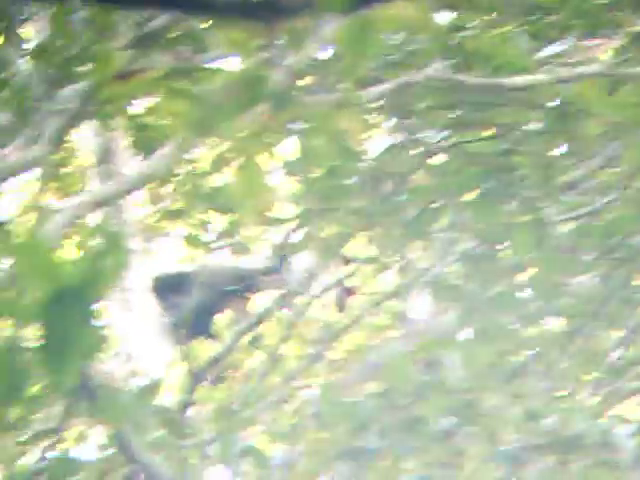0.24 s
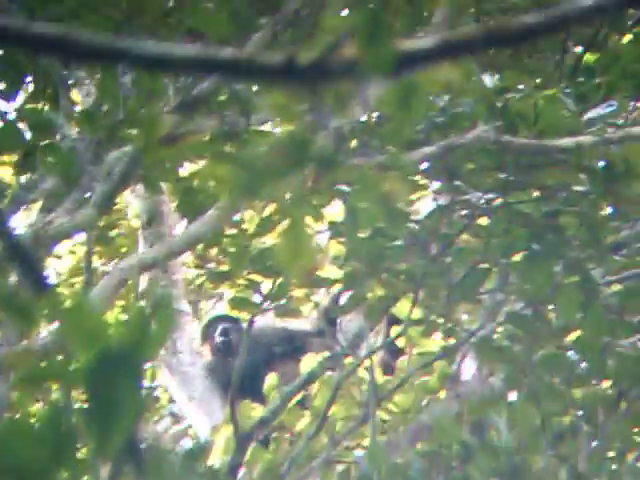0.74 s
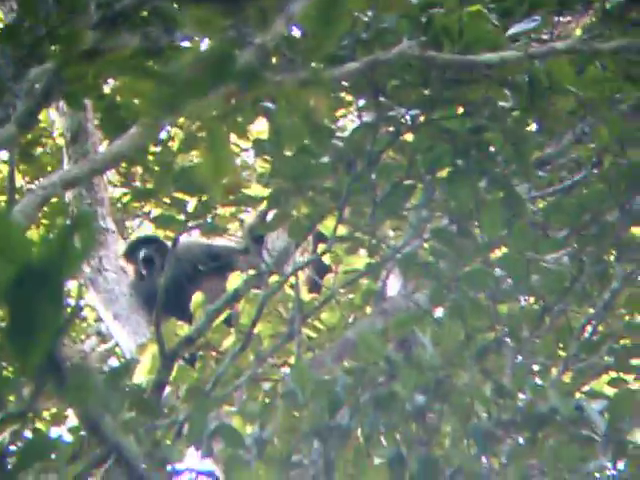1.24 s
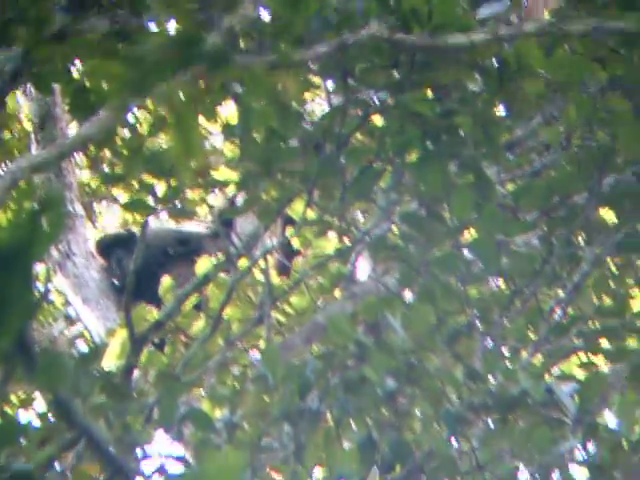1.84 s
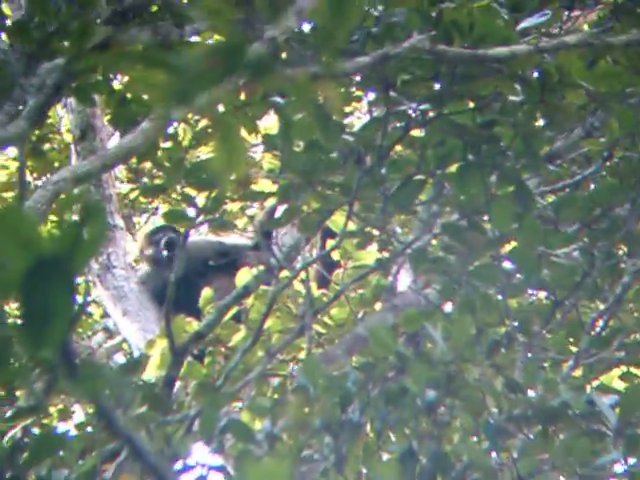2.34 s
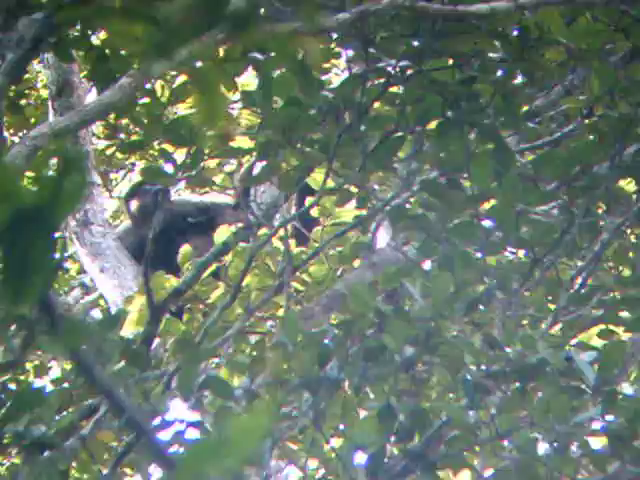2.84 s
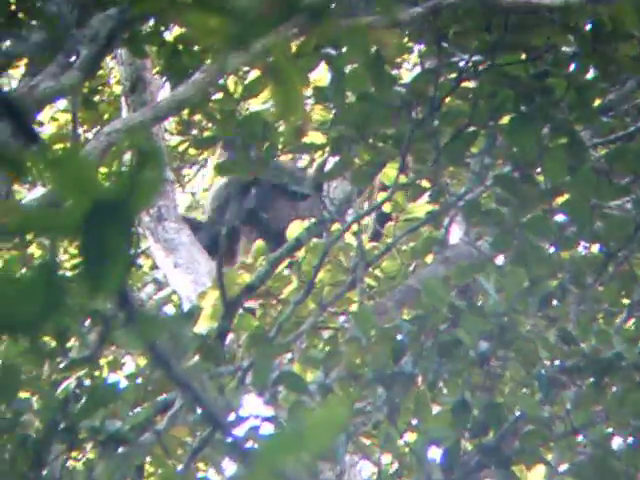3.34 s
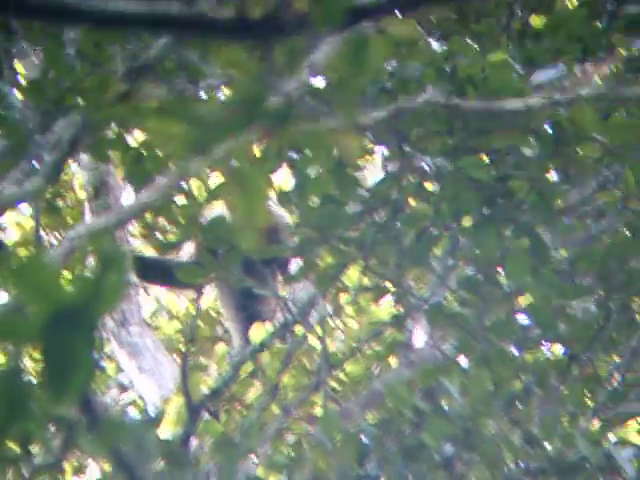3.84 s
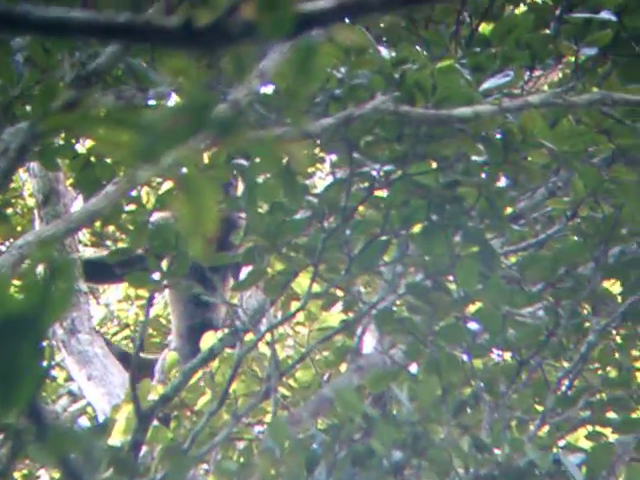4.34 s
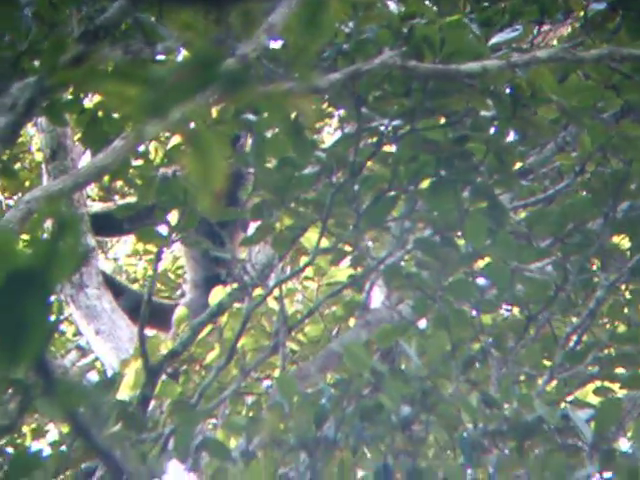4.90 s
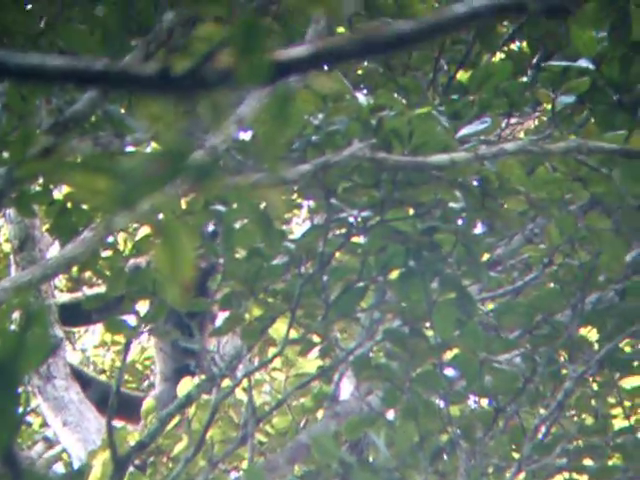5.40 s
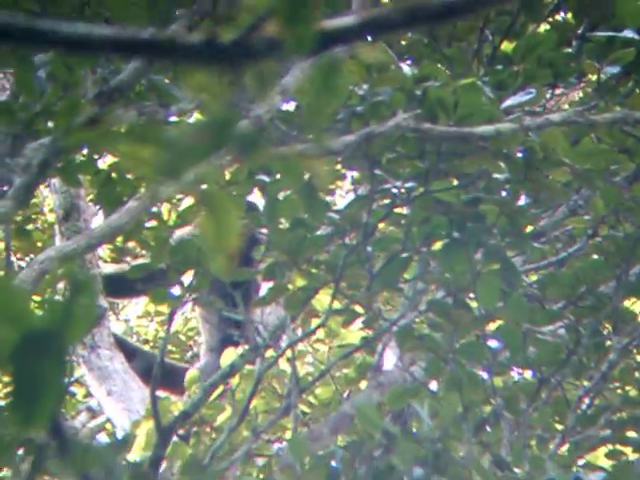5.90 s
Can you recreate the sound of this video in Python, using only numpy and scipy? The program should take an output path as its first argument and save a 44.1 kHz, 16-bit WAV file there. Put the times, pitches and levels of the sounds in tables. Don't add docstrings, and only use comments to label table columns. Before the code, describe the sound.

From the first moment a monkey in the canopy utters short, high yelps, about three per second until the end near 6 seconds. Each is almost a pure whistle that rises quickly, swells, arches and drops. Around 1 to 1.3 seconds some crack upward and roughen; from 1.6 to 2.8 they are strongest and mostly cleaner; from 3.1 onward squeaky, raspy breaks are frequent, with a lower wavering note underneath. Trunks and leaves return a long, blurred echo. A distant monkey answers faintly and hoarsely at about 1.4, 2.2 to 2.6, 3.0 and 4.2 seconds, mostly falling calls. Close handling knocks on the camera begin at once, with a low thump near 0.2, a loud sharp click at 0.85, another at 1.65, and bumps near 3.25 and 6.1. Faint insect buzz, regular thin cricket chirps and soft airy hiss continue throughout.

```python
import sys
import numpy as np
from scipy import signal
from scipy.fft import rfft, irfft
from scipy.io import wavfile
from scipy.ndimage import uniform_filter1d

SR = 44100
rng = np.random.default_rng(int(sys.argv[2]) if len(sys.argv) > 2 else 0)


def generate_wav(signal):
    frames = np.transpose(np.atleast_2d(signal))
    scaled = np.clip(frames, -1, 1) * 32767
    pcm = np.round(scaled).astype(np.int16)
    wavfile.write(sys.argv[1], SR, pcm)


def gain_from_decibels(decibels):
    exponent = np.asarray(decibels, float) / 20
    return 10 ** exponent


N = 271656

# start in seconds, length until the pitch has dropped in seconds,
# level in dB, held pitch in Hz, opening pitch in Hz.
YELPS = [(.04, 0.13, -25, 1790, 1666), (.495, 0.16, -21, 1807, 1572), (.925, 0.12, -22, 1900, 1546),
         (1.235, .14, -23, 1800, 1611), (1.575, 0.16, -20, 1848, 1675), (2.0, 0.13, -20, 1859, 1657),
         (2.395, 0.15, -19, 1900, 1743), (2.78, 0.11, -20, 1855, 1565), (3.1, 0.14, -24, 1899, 1571),
         (3.435, 0.13, -22.5, 1943, 1619), (3.775, .165, -23.5, 1844, 1393), (4.31, .12, -23.5, 1799, 1553),
         (4.66, 0.15, -25.5, 1960, 1737), (4.985, .14, -24.5, 1892, 1797), (5.285, 0.14, -24, 1900, 1824),
         (5.6, 0.15, -23, 1875, 1763), (5.975, 0.12, -23, 1840, 1560)]
# time of the top in seconds, top pitch in Hz,
# climb in seconds, fall in seconds, roughness from 0 to 1.
BREAKS = [(0.553, 1855, 0.011, 0.049, 0), (.985, 2120, .035, .02, 0.45), (1.288, 2700, 0.018, 0.025, 0.6),
          (1.638, 1900, .03, 0.041, .4), (2.062, 1950, 0.018, .025, 0.2), (2.451, 1900, 0.049, 0.036, 0.2),
          (2.839, 1863, 0.015, .03, 0), (3.167, 2350, .025, .03, .55), (3.489, 2795, .035, 0.049, 0.8),
          (3.863, 2300, .025, 0.028, 0.68), (4.369, 1797, 0.032, 0.012, 0),
          (4.705, 2637, 0.044, 0.056, 0.5), (5.022, 2256, 0.011, 0.037, .18),
          (5.342, 2690, 0.03, 0.033, 0.6), (5.639, 1850, 0.015, 0.047, .4),
          (5.688, 2493, 0.036, 0.012, 0.71), (6.035, 2017, 0.026, 0.033, 0.7)]
# start in seconds, length in seconds, pitch in Hz, level in dB.
LOWER_VOICE = [(.55, 0.1, 1196, -37), (.955, 0.065, 1060, -30), (1.27, 0.026, 1129, -24.5),
               (3.155, 0.2, 1095, -36), (3.47, .085, 1135, -30.5), (3.835, 0.13, 984, -39),
               (4.67, 0.057, 1080, -31.5), (4.72, 0.052, 1099, -31), (5.015, 0.035, 1116, -26),
               (5.075, 0.021, 1088, -21), (5.315, 0.0615, 1104, -27), (5.395, 0.024, 1165, -33.5),
               (5.615, 0.045, 875, -33.5), (5.655, 0.045, 1031, -27.5), (6.1, 0.044, 1073, -28.5)]
# start in seconds, length in seconds, level in dB,
# first pitch in Hz, last pitch in Hz.
ANSWERS = [
    (1.41, 0.073, -39.5, 1289, 956),
    (2.3, .1, -44.5, 1296, 909),
    (2.59, .15, -45, 1336, 807),
    (3.005, 0.074, -40.5, 911, 1087),
    (4.195, 0.055, -44, 1441, 1057),
    (2.171, .08, -43.5, 1665, 1347),
]
# frequency in Hz, gain in dB.
THROAT = [(1900, -10), (2400, -3), (2700, -16), (3100, -14), (3600, -12), (3900, -15), (4200, -32),
          (4700, -21), (5300, -19), (5700, -32), (8500, -50)]
# frequency in Hz, density in dB per Hz.
RASP = [(550, -40), (800, -7), (1100, -1), (1450, -8), (2200, 0), (2750, -1), (3050, -14), (3700, -9),
        (4200, -15), (5000, -17), (5700, -24), (8500, -36)]
# multiple of the pitch, level in dB.
SMEAR = [(.5, -12), (1, -4.5), (1.5, -9), (2, 0.5), (3, -5.5)]
# frequency in Hz, t60 in seconds.
FOREST = [(700, 1.5), (1200, 1.92), (1800, 1.02), (2600, 1.4), (3700, 2.1), (6000, 0.57)]
# frequency in Hz, density in dB per Hz.
AIR = [(30, -24.5), (60, -12.5), (150, -5.5), (400, -5), (800, -0.5), (1500, 12.5), (3000, -16.5),
       (4400, -6), (5400, -3.5), (7000, -9), (8600, -20.5)]
# time in seconds, level in dB.
CHORUS_LEVEL = [(0, -57), (1.5, -54), (2.2, -58.5), (3.5, -54), (5.0, -57), (6.16, -54)]
# frequency in Hz, density in dB per Hz.
CHORUS_BAND = [(4700, -39.5), (5300, -19.5), (5700, -1), (6100, -1), (6350, -6), (6800, -75.5)]
# frequency in Hz, level in dB, t60 in seconds.
BODY = [(203, -36, 0.081), (271.5, -20, 0.38), (414, -19.5, 0.0055), (731, -2, 0.023), (606, -10.5, 0.089),
        (1050, 2.5, 0.023), (1900, -8, 0.012), (2300, -4.5, 0.0063), (4200, -42, 0.071),
        (6230, -30.5, 0.0056)]
# time in seconds, peak in dB, pitch of the struck panel in Hz,
# hardness in dB per octave.
KNOCKS = [(0.045, -32, 580, 4.5), (0.188, -23, 238, -0.5), (0.341, -27.5, 560, -27), (0.671, -37, 827, 3.5),
          (1.078, -38.5, 590, -19.5), (1.514, -45, 777, -8), (1.574, -42.5, 586, 10.5),
          (1.777, -36, 781, -10.5), (1.791, -34.5, 636, 9.5), (1.834, -37.5, 847, -10),
          (1.897, -43.5, 854, 11), (2.041, -38, 596, -18), (2.089, -36, 711, 0), (2.415, -35, 840, -0.5),
          (3.248, -28, 414, 2.5), (3.625, -43.5, 623, 14.5), (4.103, -39, 490, 5), (4.142, -41.5, 274, 8),
          (5.021, -47, 694, 13), (6.116, -26, 940, 3.5)]
CLICKS = [
    (0.848, -36, 2080, 12),
    (0.852, -30.5, 1900, 16),
    (0.8535, -10.5, 778, 6.5),
    (1.6397, -24.5, 2460, 9.5),
    (1.647, -26, 630, 7),
]
# pitch in Hz, first chirp in seconds, period in seconds, chirp length in seconds,
# level in dB, tooth strikes per second.
CRICKET = (6095, .243, .4235, .21, -55.5, 235)


def read(points, hz):
    f, value = np.transpose(points)
    return np.interp(np.log(hz + 1), np.log(f + 1), value)


def evened(x):
    return x / np.sqrt(np.mean(x ** 2) + 1e-20)


def add(mix, s, sound):
    part = mix[round(s * SR):][:len(sound)]
    part += sound[:len(part)]


def coloured(colour, size):
    hz = np.fft.rfftfreq(size, 1 / SR)
    spectrum = rfft(rng.standard_normal(size)) * gain_from_decibels(read(colour, hz))
    return evened(irfft(spectrum, size))


def wobble(size, rate_hz):
    points = rng.standard_normal(size)
    return evened(signal.lfilter(*signal.butter(2, rate_hz, fs=SR), points))


def gate(t, length, edge_s):
    return np.sin(np.pi / 2 * np.clip(np.minimum(t, length - t) / edge_s, 0, 1)) ** 2


def folds(hz, rough, overtones_db):
    size = len(hz)
    jitter = (.002 + .1 * rough) * wobble(size, 150)
    phase = 2 * np.pi * np.cumsum(hz * (1 + jitter)) / SR
    flutter = np.exp(.55 * wobble(size, 30))
    overtones = sum(gain_from_decibels(read(THROAT, k * hz) - 6 * (k - 2)) * np.sin(k * phase) for k in (2, 3, 4))
    tone = np.sin(phase) + gain_from_decibels(overtones_db - 8 * rough) * flutter * overtones
    shimmer = np.exp((.12 + .8 * rough) * wobble(size, 60))
    return np.sqrt(2) * tone * shimmer


def call(hz, strength, rough, overtones_db):
    size = len(hz)
    smear_hz, smear_top_hz, smear_fall_db = 150, 4100, -32
    rough = np.clip(1.2 * rough - .12, 0, 1)
    rough = np.maximum(rough, np.clip((hz - 2100) / 2000, 0, .3))
    gusts = np.exp(.25 * wobble(size, 60))
    strain = abs(uniform_filter1d(rough, size=1100))
    phase = 2 * np.pi * np.cumsum(hz) / SR
    rasp = 1.5 * strain ** 1.5 * coloured(RASP, size) * gusts
    smear = np.zeros(size)
    for k, db in SMEAR:
        octaves_above = np.log2(np.maximum(k * hz / smear_top_hz, 1))
        band = wobble(size, smear_hz * (1 + k) / 2) * np.sin(round(2 * k) / 2 * phase)
        smear += gain_from_decibels(db + smear_fall_db * octaves_above) * band
    return strength * (folds(hz, rough, overtones_db) + rasp + 1.3 * strain * smear)


def yelp(start, length, level_db, held_hz, open_hz):
    rise_s, sag, bend = .017, .12, 3.03
    drop_s, land_hz, land_s, land_rough = .011, 1206, .019, .2
    attack_s, edge_s, swell_db, drop_db, land_db = .025, .009, 3.5, -25, -8.5
    break_db, push_db = -14.5, 1.5
    t = np.arange(SR // 4) / SR
    late = np.minimum(t / length, 1)
    drop = np.exp(np.minimum(t - length, 0) / drop_s)
    hz = (held_hz + (open_hz - held_hz) * np.exp(-t / rise_s)) * (1 - sag * late ** bend)
    db = level_db + swell_db * (late - 1)
    db += np.where(t < length, drop_db * drop ** 2, land_db)
    rough = .12 + land_rough * drop
    for top, top_hz, climb, fall, top_rough in BREAKS:
        if start < top < start + length:
            since = t + start - top
            climbing = np.clip(1 + since / climb, 0, 1) ** 1.8
            falling = np.clip(1 - abs(since / fall) ** 2.4, 0, 1)
            leap = np.where(since < 0, climbing, falling)
            strain = top_rough * np.where(since < 0, leap ** 1.46, np.sqrt(leap))
            lift_hz = (top_hz - hz) * leap
            db = db + break_db * strain + push_db * lift_hz / 1000
            hz = hz + lift_hz
            rough = rough + strain
    hz = hz + (land_hz - hz) * drop
    attack = np.minimum(t / attack_s + .29, 1)
    strength = gain_from_decibels(uniform_filter1d(db, size=200)) * attack * gate(t, length + land_s, edge_s)
    return call(hz, strength, rough, -2.5)


def branches(x, echo_db):
    taps = np.zeros(SR // 20)
    at = rng.integers(60, 1800, 9)
    taps[at] = rng.choice([-1., 1.], 9) * gain_from_decibels(echo_db - 60 * at / SR / 2.2)
    taps[0] = 1
    return signal.oaconvolve(x, taps)[:len(x)]


def forest(x, early_db):
    early_s = .3
    taps = np.zeros(2 * SR)
    at = np.arange(400, 2 * SR - 40, 40)
    taps[at + rng.integers(0, 40, len(at))] = rng.standard_normal(len(at))
    taps *= np.exp(.3 * wobble(len(taps), 25))
    hz, t, z = signal.stft(taps, SR, nperseg=256)
    decay = gain_from_decibels(-60 * t / read(FOREST, hz)[:, None]) + gain_from_decibels(early_db - 60 * t / early_s)
    tail = signal.istft(z * decay, SR, nperseg=256)[1]
    return signal.fftconvolve(x, tail / np.linalg.norm(tail))[:len(x)]


def near_monkey():
    paths = np.zeros((3, N + SR))
    for k, row in enumerate(YELPS):
        add(paths[k % 3], row[0] + 1, yelp(*row))
    for k, (s, *note) in enumerate(LOWER_VOICE):
        add(paths[k % 3], s + 1, lower_voice(*note))
    add(paths[1], .62, yelp(*YELPS[4]))
    heard = branches(paths.sum(0), -19)
    heard += gain_from_decibels(-3.5) * sum(forest(path, 3) for path in paths)
    return heard[SR:]


def air():
    return gain_from_decibels(-42.5) * coloured(AIR, N) * gain_from_decibels(2.4 * wobble(N, 7.8))


def insect_chorus():
    t = np.arange(N) / SR
    band = coloured(CHORUS_BAND, N)
    throb = 1 + .51 * np.sin(2 * np.pi * 31 * t + .61 * wobble(N, 1))
    return gain_from_decibels(np.interp(t, *np.transpose(CHORUS_LEVEL))) * band * throb


def knocks():
    out, t = np.zeros(N), np.arange(SR // 8) / SR
    for s, peak_db, panel_hz, hard_db in KNOCKS + CLICKS:
        detune = rng.uniform(.94, 1.07, len(BODY))
        ring = gain_from_decibels(-60 * t / .018) * np.sin(2 * np.pi * panel_hz * t)
        crack = uniform_filter1d(rng.standard_normal(len(t)), size=4)
        ring += gain_from_decibels(-27.5 + 3.64 * hard_db - 60 * t / .0073) * crack
        for (hz, db, t60), d in zip(BODY, detune):
            tilt_db = max(hard_db, -4) * np.log2(hz / 500)
            ring += gain_from_decibels(db + tilt_db - 60 * t / t60) * np.sin(2 * np.pi * hz * d * t)
        add(out, s, gain_from_decibels(peak_db - 3.5) * ring)
    low_cut = signal.butter(4, 190, "high", fs=SR, output="sos")
    return signal.sosfilt(low_cut, out)


def cricket():
    t = np.arange(N) / SR
    hz, first, period, length, level_db, strikes_hz = CRICKET
    singing = uniform_filter1d(1. * ((t - first) % period < length), size=900)
    teeth = 1 + .51 * np.sin(2 * np.pi * strikes_hz * t + .5 * wobble(N, 30))
    note = np.sqrt(2) * np.sin(2 * np.pi * hz * t + .9 * wobble(N, 30))
    note *= np.exp(.3 * wobble(N, 20))
    return gain_from_decibels(level_db) * singing * teeth * note


def lower_voice(length, pitch_hz, level_db):
    t = np.arange(SR // 8) / SR
    hz = pitch_hz * (1 + .035 * wobble(len(t), 25))
    return gain_from_decibels(level_db) * gate(t, length, .015) * folds(hz, .3, -9.5)


def answer(length, level_db, first_hz, last_hz):
    t = np.arange(SR // 4) / SR
    hz = last_hz + (first_hz - last_hz) * np.clip(1 - t / length, 0, 1) ** 1.9
    hoarse = np.full(len(t), .45)
    return call(hz, gain_from_decibels(level_db) * gate(t, length, .025), hoarse, -17)


def far_monkey():
    calls = np.zeros(N + SR)
    for s, *note in ANSWERS:
        add(calls, s + 1, answer(*note))
    heard = branches(calls, -7) + gain_from_decibels(3) * forest(calls, 5)
    return heard[SR:]


def scene():
    animals = near_monkey() + far_monkey() + insect_chorus() + cricket()
    return (animals + air() + knocks())[None]


def top_cut(x):
    return signal.sosfilt(signal.butter(12, 8660, fs=SR, output="sos"), x)


def record(dry):
    ceiling, offset = .66, .003
    low_pass = signal.firwin(301, 8600, window=("kaiser", 8), fs=SR)
    limited = signal.oaconvolve(dry, low_pass[None], "same")
    return top_cut(np.clip(limited, -ceiling, ceiling) + offset)


dry = scene()
out = record(dry)
generate_wav(out)
```